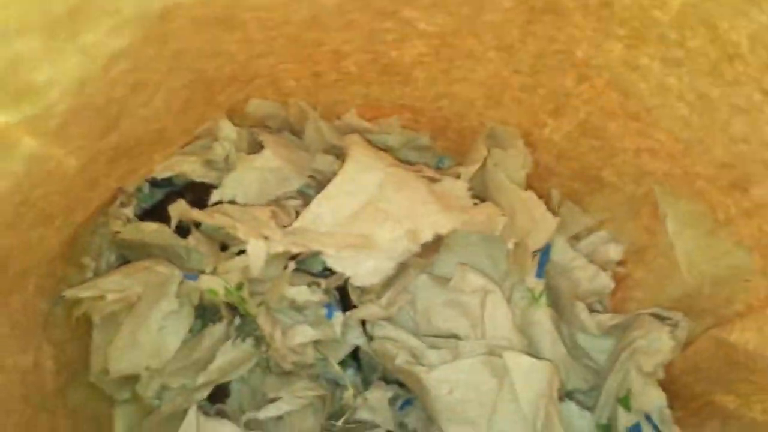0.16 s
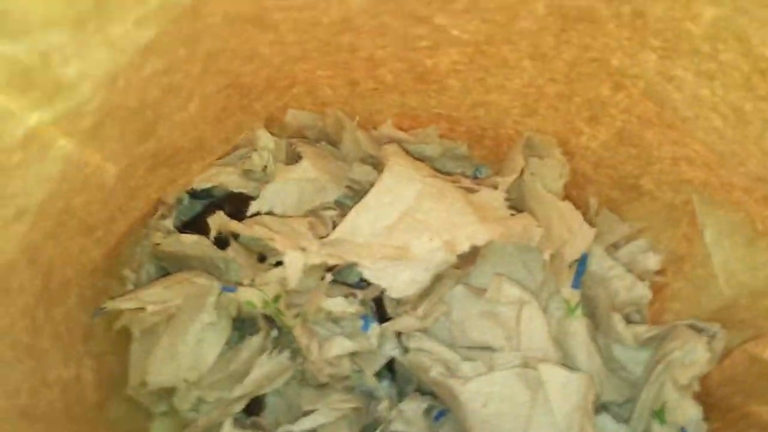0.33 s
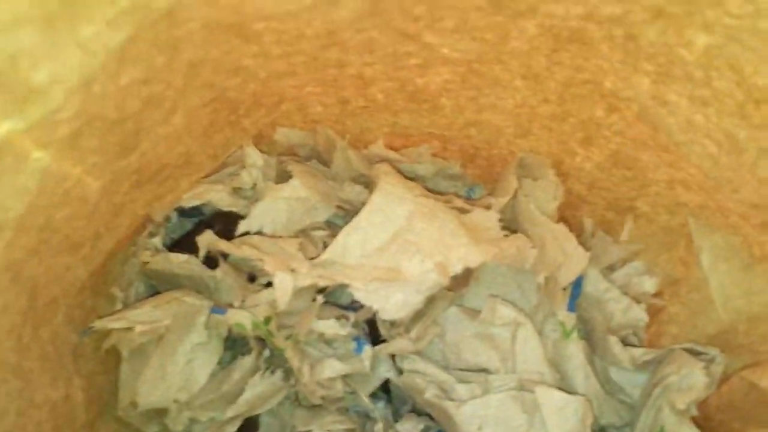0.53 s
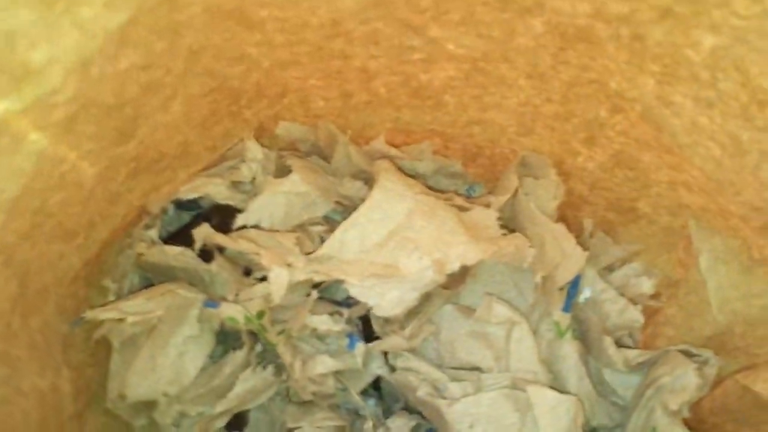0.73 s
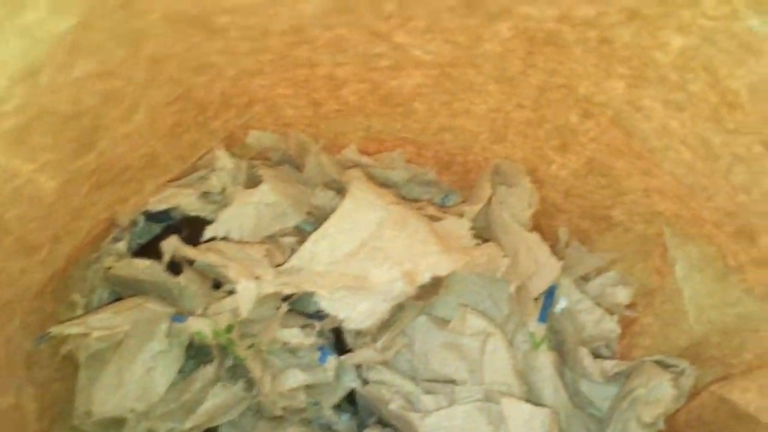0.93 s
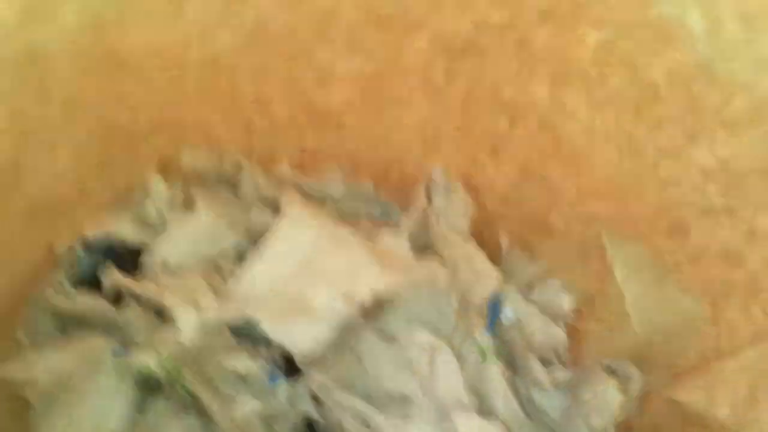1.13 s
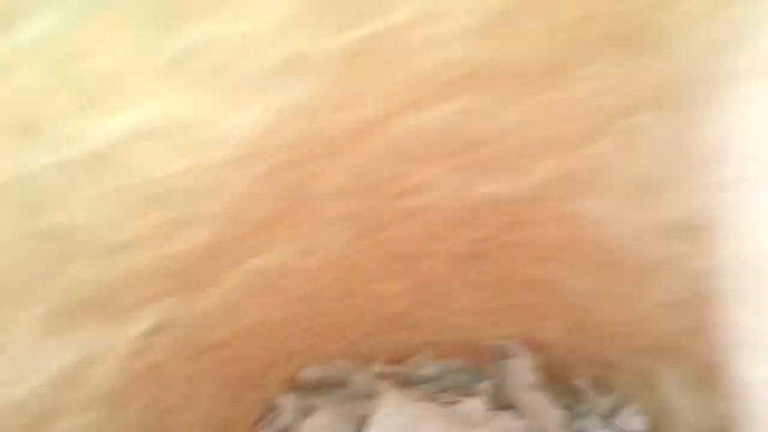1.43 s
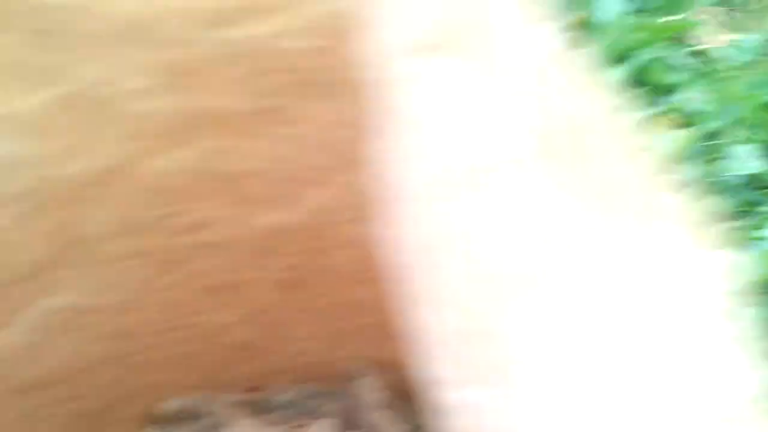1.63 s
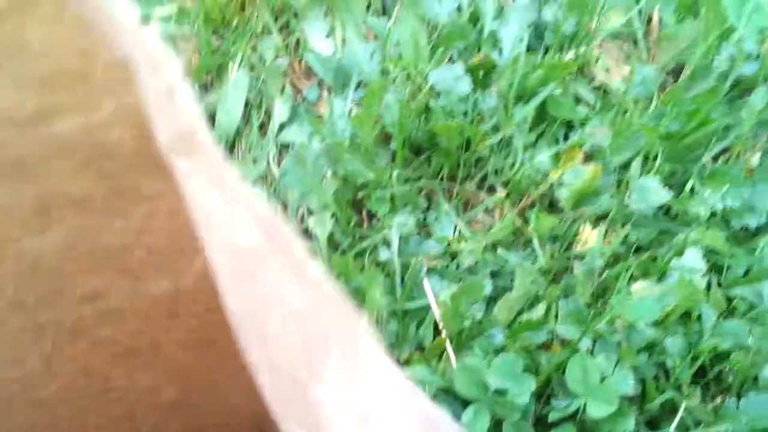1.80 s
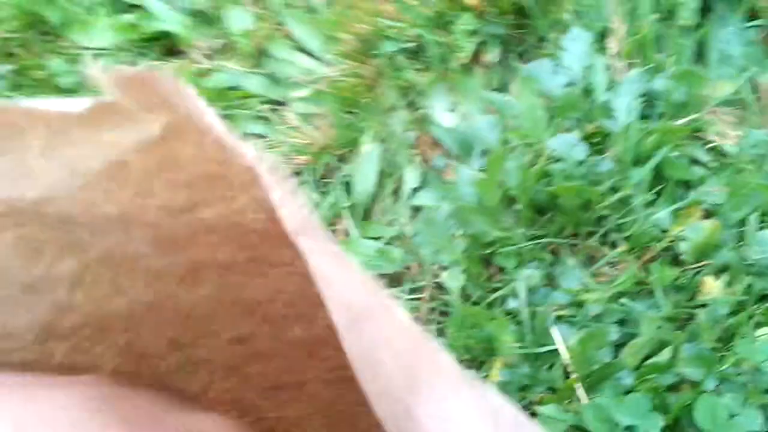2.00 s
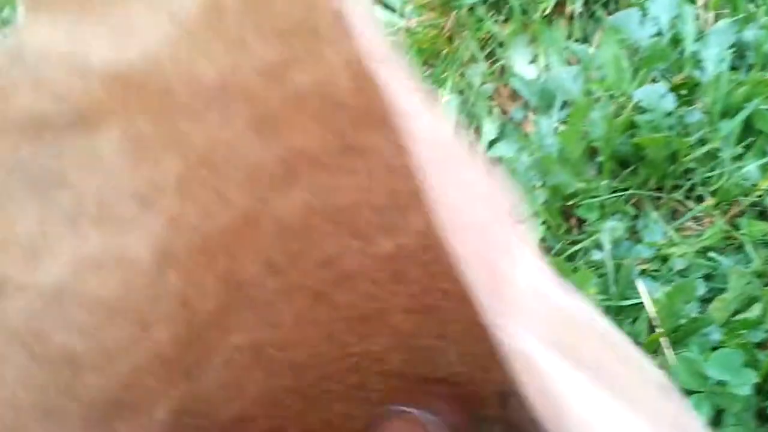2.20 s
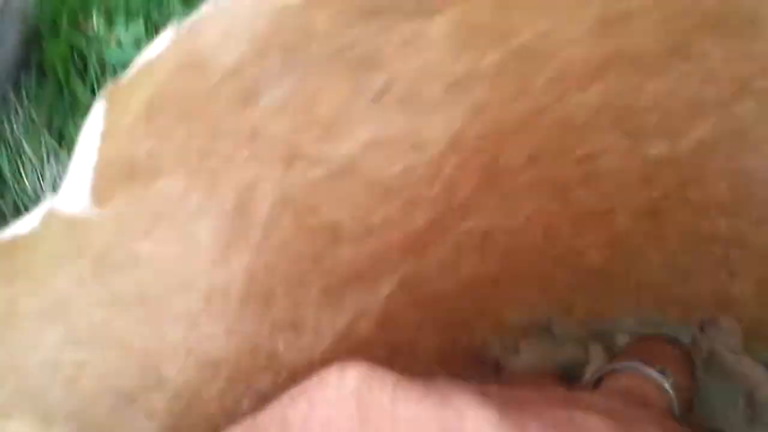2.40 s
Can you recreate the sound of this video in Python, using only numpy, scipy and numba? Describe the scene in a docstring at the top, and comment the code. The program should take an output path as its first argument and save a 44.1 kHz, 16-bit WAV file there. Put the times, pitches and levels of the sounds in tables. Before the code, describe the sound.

Dry paper crackling in short uneven bursts, starting with loud snaps and a buckling thump, swelling near the middle, quieting, then a low rumble and bright scrape; close, dry, over faint outdoor air.

```python
"""A paper bag full of crumpled scraps is handled close by, outdoors, over a faint wash of air noise.
First paper rustles over paper in tiny noise bursts, creases snap and the bag wall buckles with a thump.
Then a run of snaps, each a short noise burst with a ring, comes over a low drumming of the taut wall.
The rustle swells around one second, with single snaps and thumps, then sinks to a lull.
Near the end a hand slides down into the bag: a deep rumble and the brightest rustling."""
import sys
import numpy as np
from scipy import signal
from scipy.fft import rfft, irfft, next_fast_len
from scipy.io import wavfile
from scipy.ndimage import uniform_filter1d
from numba import njit

SR = 44100
rng = np.random.default_rng(int(sys.argv[2]) if len(sys.argv) > 2 else 0)


def to_wav(sig):
    """Store sig (one row per channel, or 1-D mono) as 16-bit WAV at the path in sys.argv[1].

    Samples outside -1..1 are clipped; the rate is SR.
    """
    pcm = np.clip(np.atleast_2d(sig), -1, 1) * 32767
    pcm = np.round(pcm).astype(np.int16)
    wavfile.write(sys.argv[1], SR, pcm.T)  # frames by channels


N = 112454   # length [samples]


def from_db(db):
    """Turn decibels into gain."""
    return 10 ** (np.asarray(db) / 20)


def rms_one(x):
    """Scale to unit power."""
    return x / np.sqrt(np.mean(x ** 2) + 1e-20)


def in_time(rows):
    """Draw straight lines between the rows: each column gets a value at every sample."""
    s, *columns = np.transpose(rows)
    return [np.interp(np.arange(N) / SR, s, c) for c in columns]


def colour(x, points):
    """Filter causally (minimum phase) to the given spectrum shape; white noise keeps its power."""
    size = 2 * next_fast_len(N)
    hz, db = np.transpose(points)
    # above the last point the spectrum falls 60 dB by half the sample rate
    hz, db = np.append(hz, SR / 2), np.append(db, db[-1] - 60)
    bin_hz = np.arange(size // 2 + 1) * SR / size
    gain = rms_one(from_db(np.interp(np.log(bin_hz + 1), np.log(hz), db)))
    # folding the cepstrum forward in time gives the minimum phase
    cepstrum = irfft(np.log(gain))
    cepstrum[1:size // 2] *= 2
    cepstrum[size // 2 + 1:] = 0
    return irfft(rfft(x, size) * np.exp(rfft(cepstrum)))[:N]


def band(x, low_hz, high_hz):
    """Keep mainly the sound between two frequencies."""
    return signal.sosfilt(signal.butter(2, [low_hz, high_hz], "band", fs=SR, output="sos"), x)


def resonate(x, hz, width_hz):
    """Ring like one springy part: a two-pole resonance with unit gain on top."""
    r = np.exp(-np.pi * width_hz / SR)
    feedback = [1, -2 * r * np.cos(2 * np.pi * hz / SR), r * r]
    return signal.lfilter(np.array([1, 0, -1]) * (1 - r * r) / 2, feedback, x)


@njit
def glide(x, w, r):
    """Two-pole resonance whose centre w (radians per sample) moves."""
    y = np.zeros(len(x))
    for i in range(2, len(x)):
        y[i] = x[i] - x[i - 2] + 2 * r * np.cos(w[i]) * y[i - 1] - r * r * y[i - 2]
    return y


def sing(x, hz, width_hz):
    """Send noise through a moving resonance; unit power."""
    return rms_one(glide(x, 2 * np.pi * hz / SR, np.exp(-np.pi * width_hz / SR)))


def add(out, s, x, db, over_s):
    """Mix in a short sound at time s; db is its level if its energy is spread over over_s."""
    i = max(int(s * SR), 0)
    x = x * from_db(db) * np.sqrt(over_s * SR / (np.sum(x ** 2) + 1e-20))
    out[i:i + len(x)] += x[:max(N - i, 0)]


OUTDOORS_DB = -58
# how the quiet outdoor air is coloured: (frequency [Hz], relative level [dB])
OUTDOORS_COLOUR = [(20, -1.5), (135, 2), (210, -2), (1200, -11), (4500, -20), (6500, -21), (12000, -17)]


def outdoor_air():
    """Faint, steady air noise, strongest in the bass."""
    return from_db(OUTDOORS_DB) * colour(rng.standard_normal(N), OUTDOORS_COLOUR)


def boom(hz, width_hz):
    """A low, rounded resonance shaken at random; steady unit power."""
    x = resonate(resonate(rng.standard_normal(N), hz, width_hz), hz, 2 * width_hz)
    return x / np.sqrt(uniform_filter1d(x ** 2, size=1200) + 1e-12)


DRUM_HZ, DRUM_WIDTH_HZ = 225, 52
# how loudly the taut wall drums under the run of snaps: (time [s], level [dB])
DRUM_LEVEL = [(.418, -85), (.428, -32.5), (.482, -50), (.497, -35), (.535, -47.5), (.573, -39), (.615, -87)]


def drumming():
    """The taut side of the bag resonates on one low note."""
    level, = from_db(in_time(DRUM_LEVEL))
    return level * boom(DRUM_HZ, DRUM_WIDTH_HZ)


JOSTLE_AT_S, JOSTLE_S, JOSTLE_DB, JOSTLE_HZ = 2.03, 0.029, -43.5, 60   # JOSTLE_S: fade each way


def jostle():
    """The whole bag rumbles deeply as the hand meets it, swelling and fading around one moment."""
    level = from_db(JOSTLE_DB) * np.exp(-np.abs(np.arange(N) / SR - JOSTLE_AT_S) / JOSTLE_S)
    return level * boom(JOSTLE_HZ, JOSTLE_HZ)


# the flap's band runs from note / FLAP_BELOW to note * FLAP_ABOVE
FLAP_S, FLAP_DB, FLAP_BELOW, FLAP_ABOVE = 0.0059, -8, 8, 2.63
# a buckled panel slackens, so its crunch falls in pitch (start and end as multiples of its note)
SAG_FROM, SAG_TO, SAG_S = 1.74, 0.57, 0.011
CRUNCH_S, CRUNCH_WIDTH, CRUNCH_DB = 0.0073, 0.49, -3.5   # width as a share of the note
MODES_DB, PANEL_OCTAVES = -6, 1   # a panel rings modes within about an octave of its note
# ringing of the bag's air and walls, before a small random detuning:
# (frequency [Hz], relative strength [dB], time to fade by 60 dB [s])
BAG_MODES = [(122.5, -3, 0.22), (236, 2, 0.07), (304, -9, 0.11), (524.7, -6, 0.1), (730, -3.5, 0.084),
             (947, -3, 0.07)]
# the wall buckles: (time [s], level before each part's own [dB], note of the panel [Hz])
BUCKLES = [(0.236, -24.5, 600), (0.236, -27, 99), (.321, -37, 560), (.6155, -33.5, 590), (0.6205, -29, 237),
           (.667, -44, 560), (.828, -23.5, 278), (.8285, -32, 676), (1.14, -36, 530), (2.148, -34, 840),
           (2.305, -37, 900)]


def thumps():
    """A wall panel pops over: a dull flap, a falling crunch, and the bag's modes nearest its note."""
    out, t = np.zeros(N), np.arange(SR // 5) / SR
    hz, db, t60 = np.transpose(BAG_MODES)[:, :, None]
    for s, thump_db, note_hz in BUCKLES:
        flap = rng.standard_normal(len(t)) * np.exp(-t / FLAP_S)
        flap = band(flap, note_hz / FLAP_BELOW, note_hz * FLAP_ABOVE)
        falling_hz = note_hz * (SAG_TO + (SAG_FROM - SAG_TO) * np.exp(-t / SAG_S))
        burst = rng.standard_normal(len(t)) * np.exp(-t / CRUNCH_S)
        crunch = sing(burst, falling_hz, note_hz * CRUNCH_WIDTH)
        detune, side = rng.standard_normal((2, len(BAG_MODES), 1))
        nearness = np.exp(-(np.log2(hz / note_hz) / PANEL_OCTAVES) ** 2)
        strength = np.sign(side) * from_db(db) * nearness
        fade = np.exp(-np.log(1000) * t / t60)
        modes = strength * fade * np.sin(2 * np.pi * hz * (1 + 0.033 * detune) * t)
        for part, part_db in (flap, FLAP_DB), (crunch, CRUNCH_DB), (modes.sum(0), MODES_DB):
            add(out, s, part, thump_db + part_db, over_s=.006)
    return out


SNAP_RISE_MS, SNAP_FALL_POWER = 0.061, 1.15
FOLD_ECHO_MS, FOLD_ECHO_SHARE = 1.298, 0.42
# how the cracks are coloured: (frequency [Hz], relative level [dB])
CRACK_COLOUR = [(300, -5.5), (1200, 2.5), (2200, 1), (7000, 4), (8600, -7), (11500, -4.5)]
# creases snap:
# (time [s], crack level [dB], ring frequency [Hz], ring level [dB], fall time of the burst [ms])
CREASE_SNAPS = [(0.2266, -20, 6380, -12, 1.7), (0.2299, -18, 6300, -41, 1.5),
                (0.2334, -14, 6130, -13.5, 1.4), (0.2349, -18.5, 5900, -36, 1.6),
                (0.388, -43.5, 6060, -43, 2), (0.4239, -25, 7230, -26, 2.7),
                (0.4296, -24.5, 7100, -27.5, 0.82), (0.4379, -35, 5260, -31, 1),
                (0.4471, -30.5, 7440, -28.5, 2.1), (.456, -33, 5060, -31, 0.91),
                (0.463, -32, 7300, -33, 1.4), (0.486, -29, 4000, -32.5, 2), (0.4905, -27, 4850, -31, 2.8),
                (0.4943, -25, 4870, -43, 2.6), (0.5122, -38, 7470, -39, 0.9),
                (0.5274, -31.5, 7300, -36, 1.4), (0.535, -35, 6950, -26.5, 5.8),
                (0.5653, -32.5, 7100, -29, 5.5), (0.653, -45, 3270, -43.5, 1),
                (0.6985, -48, 7300, -40.5, 0.35), (0.8268, -25.5, 7860, -26, 4.7),
                (1.1564, -36.5, 4930, -31.5, 1.2), (1.203, -42, 1700, -37, 2.8),
                (1.2995, -33, 4850, -27, 3.6), (1.5308, -41, 7040, -39.5, 2.4), (1.709, -51, 3500, -51, 1),
                (1.751, -38, 3120, -52, 0.45), (1.8732, -45.5, 2250, -43, 0.77),
                (1.999, -26.5, 5700, -27.5, 12), (2.0113, -29, 5470, -25.5, 2.1),
                (2.096, -51, 6500, -26.5, 6.7), (2.1091, -34.5, 5270, -21.5, 3.8),
                (2.1466, -30, 6040, -26.5, 3.5), (2.263, -57, 930, -29, 11), (2.3056, -31, 4430, -33, 0.79),
                (2.3944, -43.5, 1750, -42, 1.2), (2.461, -37.5, 6120, -37, 10),
                (2.5, -43, 1870, -39.5, 1.2), (2.5451, -29.5, 4940, -33, 3.5)]


def snaps():
    """Each crease gives way in a brief burst, bounces off the nearest wall and rings the facet beside it."""
    cracks, rings = np.zeros(N), np.zeros(N)
    ms = np.arange(SR // 40) * 1000 / SR
    for s, crack_db, ring_hz, ring_db, fall_ms in CREASE_SNAPS:
        shape = (1 - np.exp(-ms / SNAP_RISE_MS)) * np.exp(-(ms / fall_ms) ** SNAP_FALL_POWER)
        crack, ring = rng.standard_normal((2, len(ms))) * shape
        # the bounce comes back upside down
        crack = crack - FOLD_ECHO_SHARE * np.roll(crack, int(FOLD_ECHO_MS * SR / 1000))
        ring = resonate(resonate(ring, ring_hz, width_hz=410), ring_hz, width_hz=5900)
        add(cracks, s, crack, crack_db, over_s=0.0027)
        add(rings, s, ring, ring_db, over_s=0.0028)
    return colour(cracks, CRACK_COLOUR) + rings


SLIP_S, SMOOTH_SHARE = 0.00029, 0.28   # fade of a burst's power; power of the smooth friction


def grains(per_s, spread_db):
    """Random tiny bursts, mostly small and a few large, over smooth friction; steady unit power."""
    sizes = from_db(spread_db * np.minimum(rng.exponential(1, N), 4.5))
    sizes = sizes * (rng.random(N) < per_s / SR)
    power = signal.lfilter([1], [1, -np.exp(-1 / (SLIP_S * SR))], sizes ** 2 + 1e-12)
    x = np.sqrt(power / power.mean() + SMOOTH_SHARE) * rng.standard_normal(N)
    return x / np.sqrt(uniform_filter1d(x ** 2, size=900))


CRUMPLES_PER_S, CRUMPLE_SPREAD_DB, CRUMPLE_DB = 600, 2.5, -4.0
# how the flexing wall is coloured: (frequency [Hz], relative level [dB])
BASS_COLOUR = [(20, -8), (50, -1), (115, 5.5), (170, -1.5), (340, -2), (900, -26)]


def flexing(bass):
    """The wall flexes under the sliding paper in low, grainy noise."""
    return colour(grains(CRUMPLES_PER_S, CRUMPLE_SPREAD_DB) * bass, BASS_COLOUR)


HOLLOW_WIDTH_HZ, HOLLOW_DB = 220, -6.5
# the crumpling panel's hollow note: (time [s], centre frequency [Hz])
HOLLOW_NOTE = [(.33, 563), (.5, 1380), (.94, 624), (1.25, 504), (1.35, 1210), (2.15, 860), (2.5, 1600)]


def hollow_note(middle):
    """Crumpling grains sound a panel whose note wanders."""
    hz, = in_time(HOLLOW_NOTE)
    note = sing(grains(CRUMPLES_PER_S, CRUMPLE_SPREAD_DB), hz, HOLLOW_WIDTH_HZ)
    return note * middle * from_db(HOLLOW_DB)


# how the crumpling is coloured: (frequency [Hz], relative level [dB])
MIDDLE_COLOUR = [(200, -16), (420, -5.5), (1000, -4), (3500, -8)]


def crumpling(middle):
    """Paper crumples in bursts of mid-pitched noise."""
    bursts = grains(CRUMPLES_PER_S, CRUMPLE_SPREAD_DB) * middle
    return from_db(CRUMPLE_DB) * colour(bursts, MIDDLE_COLOUR)


CRINKLES_PER_S, CRINKLE_DB, CRINKLE_Q, CRINKLE_SPREAD_DB = 200, -12.5, 6.3, 3.3
CRINKLE_FOLLOWS = 0.81   # share of the rustle's swing in dB


def crinkles(treble, middle):
    """Small facets of the scraps flip at random, each ticking at one of many pitches."""
    sizes = from_db(CRINKLE_SPREAD_DB * np.minimum(rng.exponential(1, N), 4)) * rng.choice([-1, 1], N)
    clicks = sizes * (rng.random(N) < CRINKLES_PER_S / SR)
    pitches = np.geomspace(900, 9000, 26)   # Hz
    dealt = rng.integers(0, len(pitches), N)
    ticks = np.zeros(N)
    for k, hz in enumerate(pitches):
        ticks += resonate(clicks * (dealt == k) + 1e-18, hz, hz / CRINKLE_Q)
    return rms_one(ticks) * np.sqrt(treble * middle) ** CRINKLE_FOLLOWS * from_db(CRINKLE_DB)


SLIPS_PER_S, SLIP_SPREAD_DB, SLIP_DB = 1100, 1.6, -4
ZIP_WIDTH_HZ = 670
# the sliding sheet sings in a broad resonance:
# (time [s], centre frequency [Hz], level relative to the rustle's treble [dB])
SHEET_ZIP = [(.3, 5880, -0.5), (.5, 7500, -18), (.9, 7900, -8.5), (1.04, 6860, 3), (1.1, 6300, -12.5),
             (1.2, 6300, 3), (1.3, 5640, 1), (1.45, 6500, -17)]


def singing_sheet(treble):
    """Tiny slips excite a sliding sheet, whose bright resonance glides."""
    hz, db = in_time(SHEET_ZIP)
    drag = sing(grains(SLIPS_PER_S, SLIP_SPREAD_DB), hz, ZIP_WIDTH_HZ)
    return rms_one(band(drag, 4300, 8500)) * treble * from_db(db)


# how the slips are coloured: (frequency [Hz], relative level [dB])
TREBLE_COLOUR = [(1500, -17.5), (3100, -4.5), (4200, -3.5), (5500, 0.5), (7200, -1.5), (11500, -10.5)]


def slips(treble):
    """Paper sticks and slips over paper in tiny bright bursts."""
    return from_db(SLIP_DB) * colour(grains(SLIPS_PER_S, SLIP_SPREAD_DB) * treble, TREBLE_COLOUR)


# how the rustle rises and falls, before each layer's own level:
# (time [s], treble level [dB], middle level [dB], bass level [dB])
RUSTLE_LEVELS = [(.03, -49, -47, -64), (.1, -63, -50.5, -52.5), (.118, -40.5, -48, -52),
                 (.21, -41.5, -40, -54), (.27, -40, -42, -44), (.32, -39.5, -41, -50),
                 (.36, -56.5, -53.5, -54.5), (.41, -48.5, -55, -53.5), (.44, -47.5, -46.5, -49),
                 (.54, -34.5, -42.5, -44.5), (.6, -49.5, -57.5, -50.5), (.81, -52.5, -54.5, -56),
                 (.86, -43, -50.5, -49), (.88, -57, -54, -48), (.895, -34.5, -45, -44),
                 (.95, -52, -47.5, -49.5), (1.0, -42, -39, -53), (1.02, -36, -36, -38),
                 (1.07, -26.5, -35, -36.5), (1.13, -32, -36, -45), (1.19, -48, -48.5, -51),
                 (1.25, -38, -41.5, -45.5), (1.295, -35, -45, -61), (1.385, -58, -60, -62),
                 (1.465, -38, -51, -63.5), (1.56, -62, -63.5, -71), (1.61, -42.5, -54.5, -60),
                 (1.64, -58, -71, -67.5), (1.965, -54.5, -67, -63), (2.01, -32.5, -47, -47),
                 (2.045, -52, -57, -56), (2.08, -36, -52.5, -69), (2.105, -19.5, -49, -52),
                 (2.125, -32, -45, -51), (2.155, -24, -35, -54), (2.205, -33, -49.5, -57),
                 (2.27, -30, -47, -54), (2.315, -48, -49, -56), (2.425, -39, -49, -58.5),
                 (2.448, -47, -54, -67), (2.55, -38, -41.5, -54)]


def rustle():
    """Sliding paper: its bright, middle and low layers follow three loudness curves."""
    treble, middle, bass = from_db(in_time(RUSTLE_LEVELS))
    bright = slips(treble) + singing_sheet(treble) + crinkles(treble, middle)
    return bright + crumpling(middle) + hollow_note(middle) + flexing(bass)


def scene():
    """The bag over faint outdoor air, the same in both channels."""
    air = outdoor_air()
    bag = rustle() + snaps() + thumps() + drumming() + jostle()
    return np.tile(bag + air, (2, 1))


OVERLOAD, CUTOFF_HZ = 1, 11900   # OVERLOAD: the height that peaks are rounded towards


def record(dry):
    """Loud peaks are rounded off and the top is cut steeply."""
    rounded = OVERLOAD * np.tanh(dry / OVERLOAD)
    return signal.sosfilt(signal.ellip(12, .1, 70, CUTOFF_HZ, fs=SR, output="sos"), rounded)


dry = scene()
out = record(dry)
to_wav(out)
```